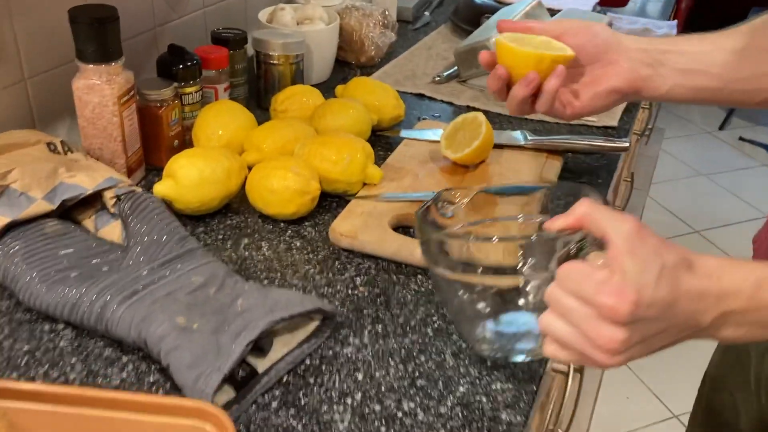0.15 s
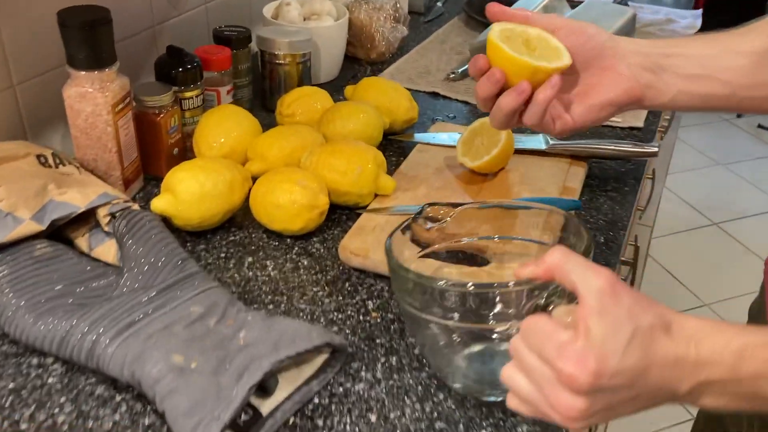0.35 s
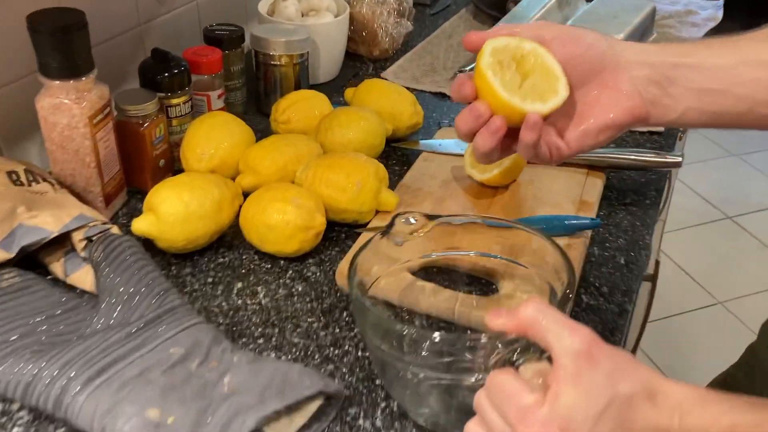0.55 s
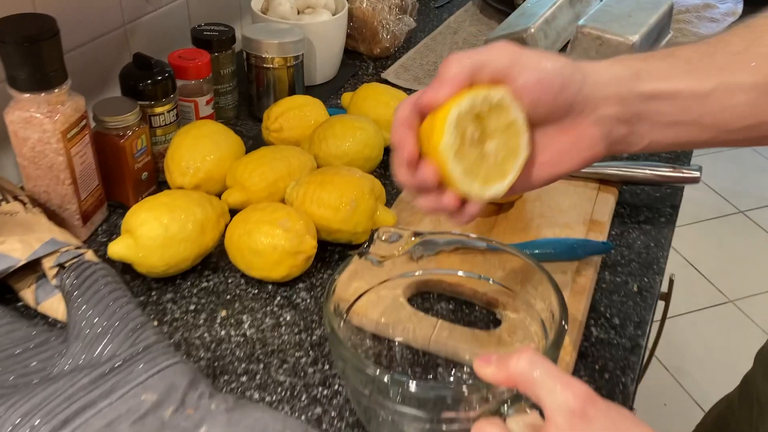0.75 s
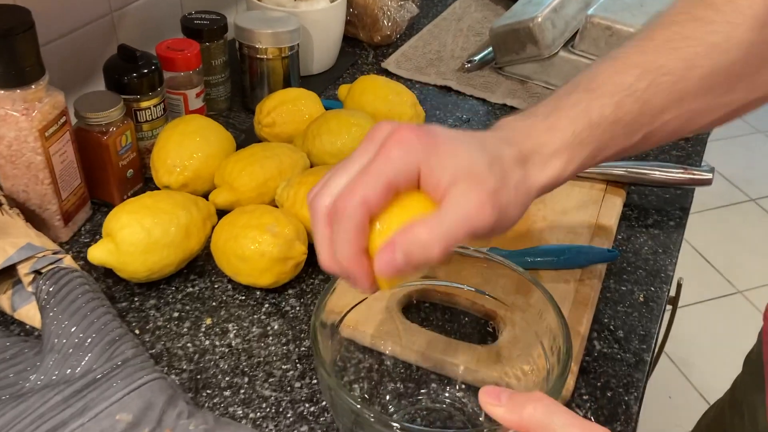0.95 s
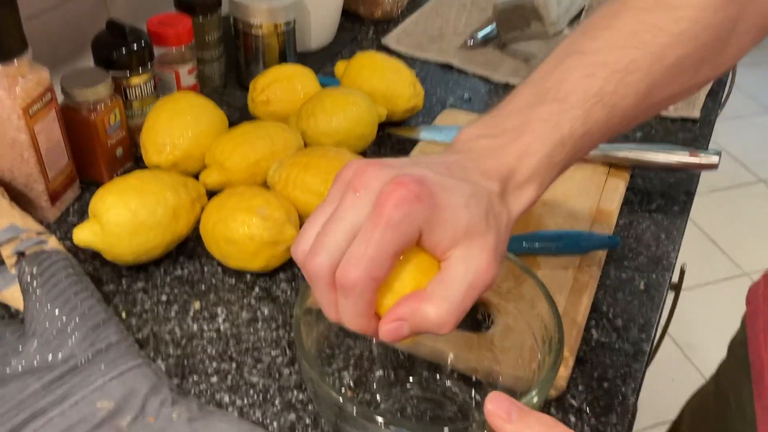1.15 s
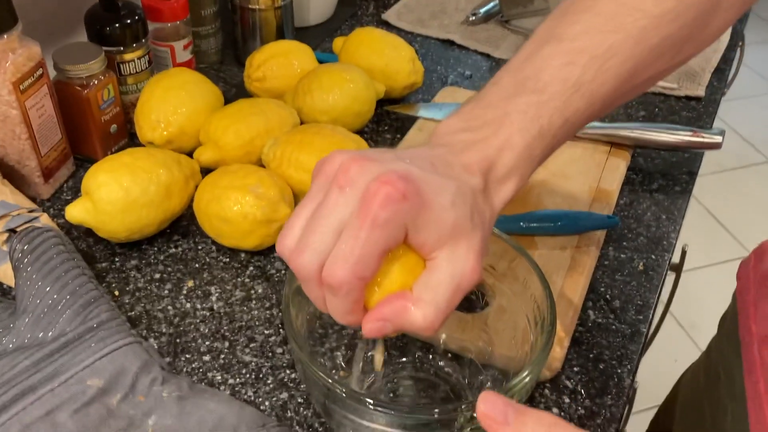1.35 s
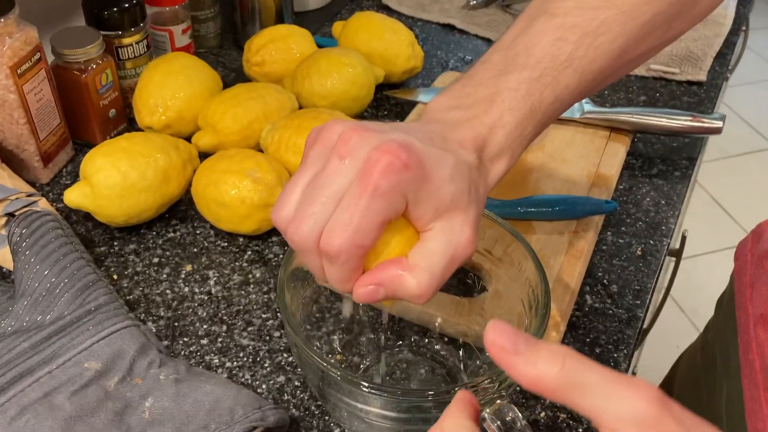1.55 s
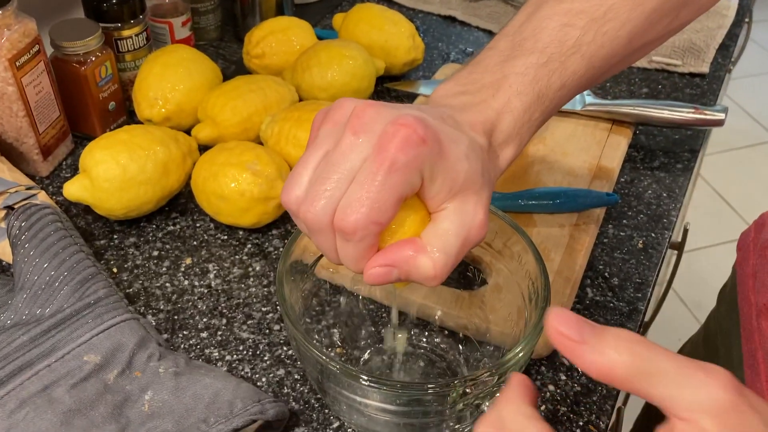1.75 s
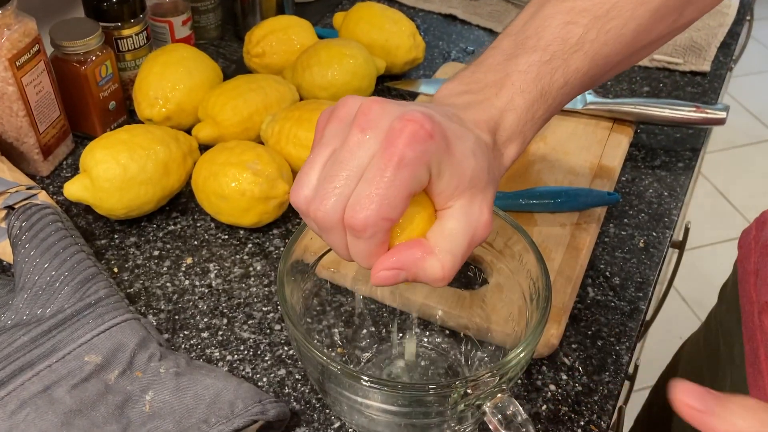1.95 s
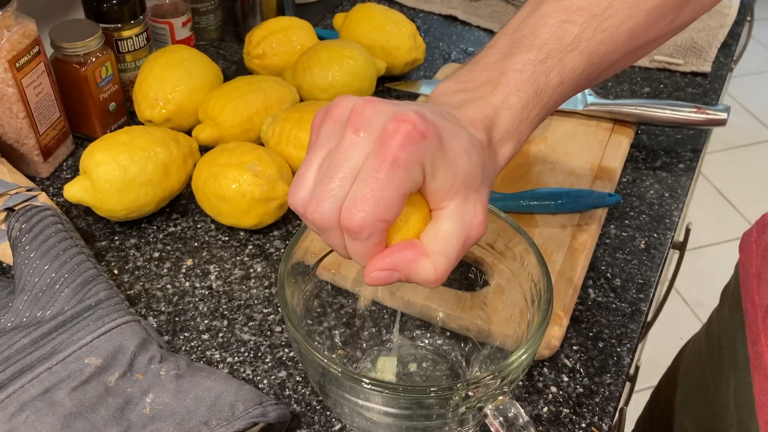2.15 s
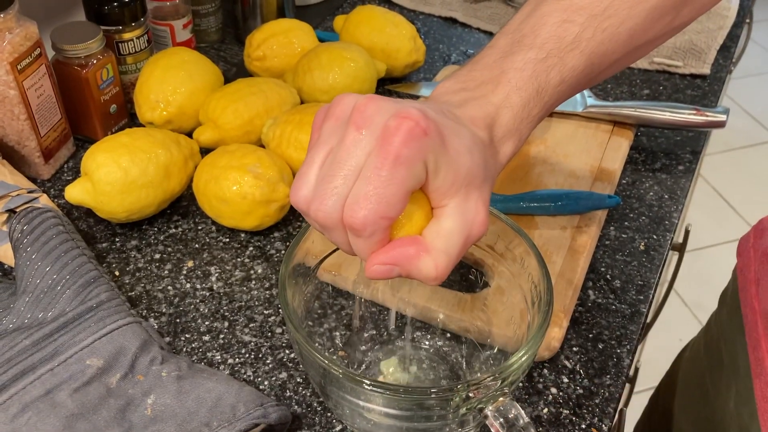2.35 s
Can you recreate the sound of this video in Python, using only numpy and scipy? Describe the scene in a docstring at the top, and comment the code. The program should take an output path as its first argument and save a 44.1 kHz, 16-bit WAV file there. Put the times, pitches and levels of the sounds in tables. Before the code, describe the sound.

Lemon squeezing over a glass jug: a wooden knock, rustle, jug set down, then wet crackles and drips

```python
"""In a kitchen, a lemon half is squeezed over a glass jug.
Something wooden knocks, a rustle of noise and scuffs goes on, and the jug is set down on the stone counter.
Both blows are sets of ringing tones with a noisy tail; the jug also keeps a thin, faint note.
Then the pulp fizzes and snaps in bursts of noise, and juice drops tick into the glass as short rough blips.
Room rumble, hiss and a wavering appliance hum, all made from filtered noise, lie below."""
import sys
import numpy as np
from scipy import signal
from scipy.fft import rfft, irfft
from scipy.io import wavfile

SR = 44100
rng = np.random.default_rng(int(sys.argv[2]) if len(sys.argv) > 2 else 0)


def dump(signal):
    """Clip the signal to [-1, 1] and save it as 16-bit WAV at the path in sys.argv[1]."""
    limited = np.clip(np.atleast_2d(signal).T, -1, 1)
    pcm = np.round(limited * 32767).astype(np.int16)
    wavfile.write(sys.argv[1], SR, pcm)


def magnitude_from_level(level_db):
    """Linear magnitude for a level in decibels (20 dB per decade)."""
    exponent = np.asarray(level_db, float) / 20
    return 10 ** exponent


N = 110250
TIME = np.arange(N) / SR


def rms_one(x):
    """Scale to rms 1."""
    return x / np.sqrt(np.mean(x ** 2) + 1e-20)


def at_hz(points, hz, column=1):
    """Read a table between its rows, on a log-frequency axis."""
    points = np.array(points)
    return np.interp(np.log(hz), np.log(points[:, 0]), points[:, column])


def drift(rate_hz):
    """Random wander of rms 1: noise smoothed twice, computed at every 40th sample."""
    r = np.exp(-2 * np.pi * rate_hz * 40 / SR)
    noise = rng.standard_normal(N // 40 + 2002)
    slow = signal.lfilter([1], [1, -2 * r, r * r], noise)[2000:]  # skip the filter's start
    return np.interp(np.arange(N) / 40, np.arange(len(slow)), rms_one(slow))


def ring(clicks, hz, t60):
    """A resonator: each unit click starts a sine of height 1 that falls 60 dB in t60 seconds."""
    r = magnitude_from_level(-60 / (t60 * SR))
    w = 2 * np.pi * hz / SR
    return signal.lfilter([0, np.sin(w)], [1, -2 * r * np.cos(w), r * r], clicks + 1e-18)


def dying(start, t60, rise):
    """Envelope that rises quickly at start and falls 60 dB in t60 (all in seconds)."""
    t = np.maximum(TIME - start, 0)
    return (1 - np.exp(-t / rise)) * np.exp(-np.log(1000) * t / t60)


# how alike left and right are: (frequency [Hz], likeness [0 to 1])
LEFT_RIGHT_LIKENESS = [(40, 1), (70, 1), (130, 0.73), (290, 0.33), (640, 0.062), (1400, 0.042),
                       (6000, 0.011)]


def bands(extra_likeness=0.):
    """Stereo noise of equal power per Hz, cut into bands of 0.4 octave, given as (Hz, noise)."""
    edges = 20 * 2 ** np.arange(0, 9.8, .4)
    white = rng.standard_normal((2, 2, N))
    for k, (low, high) in enumerate(zip(edges, edges[1:])):
        band_filter = signal.butter(2, [low, high], "band", fs=SR, output="sos")
        # neighbouring bands take different noise
        mid, side = signal.sosfilt(band_filter, white[k % 2])
        hz = np.sqrt(low * high)
        alike = at_hz(LEFT_RIGHT_LIKENESS, hz)
        alike = np.clip(alike + (1 - alike) * extra_likeness, 0, 1)
        opposite = side * np.array([[1], [-1]])
        yield hz, (np.sqrt(1 + alike) * mid + np.sqrt(1 - alike) * opposite) / np.sqrt(2)


def coloured(spectrum, patchy_db, lift_db=0):
    """Stereo noise with flickering bands; rms 1 before a treble lift that is full from 5 kHz up."""
    together, out, power = drift(13.0), 0, 0
    for hz, noise in bands():
        flicker_db = patchy_db * (0.12 * together + drift(27.0))
        band = magnitude_from_level(at_hz(spectrum, hz) + flicker_db) * noise
        power += np.mean(band ** 2)
        lift_share = np.clip(np.log(hz / 500) / np.log(10), 0, 1)  # none below 500 Hz
        out = out + band * magnitude_from_level(lift_db * lift_share)
    return out / np.sqrt(power)


# colour of the kitchen background: (frequency [Hz], relative level [dB per Hz])
ROOM_COLOUR = [(20, -35), (35, 7), (55, -5.5), (75, 1), (100, -4), (170, -19), (240, -11), (350, -13.5),
               (700, -22.5), (1700, -27), (3000, -34), (4200, -47), (7200, -39), (8300, -52.5), (9300, -24),
               (10400, -34.5), (12000, -38), (13700, -49), (15300, -50), (16300, -64)]
# wavering appliance hum: (frequency [Hz], width [Hz], level [dB])
HUM_BANDS = [(66.2, 10.5, -44), (116.8, 8.1, -43.5), (235.6, 6.2, -51)]
# faint tones dying away at the start: (frequency [Hz], level [dB], time to fall 60 dB [s])
FADING_TONES = [(289.5, -47, 6.2), (430, -51, 1.9), (793, -54, 1.7)]


def background():
    """Room rumble and hiss as noise, hum as noise through narrow resonators, and a few fading sines."""
    room_db, hum_wander_db = -41, 2.47
    out = magnitude_from_level(room_db) * coloured(ROOM_COLOUR, patchy_db=1.37)
    for hz, width_hz, db in HUM_BANDS:
        hum = rms_one(ring(rng.standard_normal(N), hz, 2.02 / width_hz))
        out += magnitude_from_level(db + hum_wander_db * drift(5.2)) * hum
    for hz, db, t60 in FADING_TONES:
        tone = np.sin(2 * np.pi * (hz * TIME + rng.random()))
        out += magnitude_from_level(db) * dying(0, t60, 0.00023) * tone
    return out


# course of the rustle and of the noisy room tail after the set-down:
# (time [s], level [dB], treble lift of the patchy noise [dB])
RUSTLE_COURSE = [(0, -73.5, 28), (.1, -62, 20), (.2, -52.5, 5.5), (.45, -45, 3), (.53, -46.5, -1),
                 (0.557, -38.5, -8.5), (.585, -39.5, -10.5), (.64, -40.5, -1), (.67, -43, 4.5),
                 (.72, -46.5, 4.5), (.77, -52, -0.5), (.85, -59, -16), (.875, -48.5, -45),
                 (.905, -43.5, -6), (1.05, -53, -18), (1.14, -59.5, 16.5), (1.301, -59.5, 6)]
# colour of the patchy noise: (frequency [Hz], relative level [dB per Hz])
PATCHY_COLOUR = [(60, -11), (110, -17), (300, -3.5), (600, -17), (1200, -14), (2500, -26.5), (4500, -34),
                 (8000, -35), (16000, -44)]
# body of the scuffs: (frequency [Hz], width setting [Hz], relative level [dB])
SCUFF_BODY = [(100, 47, -2.5), (286, 59, 2), (432, 93, 6), (682, 41, -1.5), (847, 54, -2),
              (1120, 340, -10.5), (2450, 150, -11.5)]


def rustle():
    """Patchy noise plus uneven grains through dull resonators, before and after the set-down."""
    s, db, lift_db = np.transpose(RUSTLE_COURSE)
    # left is 3 dB above right
    level = magnitude_from_level(np.interp(TIME, s, db, right=-120) + np.array([[1.5], [-1.5]]))
    scuffs_per_s = 110
    scuffs = 0
    for hz, width_hz, ring_db in SCUFF_BODY:
        sizes = magnitude_from_level(4.65 * np.minimum(rng.exponential(1, N), 4))
        signs = rng.choice([-1, 1], N)
        grains = sizes * signs * (rng.random(N) < scuffs_per_s / SR)
        # noise of its own on each side blurs the grains
        grains = grains + .5 * np.std(grains) * rng.standard_normal((2, N))
        body = rms_one(ring(grains, hz, 3.6 / width_hz))
        scuffs = scuffs + magnitude_from_level(ring_db + 3.5 * drift(7)) * body
    patchy = coloured(PATCHY_COLOUR, patchy_db=2.5, lift_db=np.interp(TIME, s, lift_db))
    return level * (patchy + rms_one(scuffs))


BLOW_LEAN = magnitude_from_level([[.75], [-.75]])   # lifts the left of both blows 1.5 dB over the right


def struck(touches, modes):
    """Every touch strikes every ringing tone, unevenly; the contact softens the top."""
    mode_lag_s, contact_cut_hz = .00035, 4500   # lag: largest random delay on either side
    out = np.zeros((2, N))
    s, peak_db, tilt_db = np.transpose(touches)
    for hz, db, t60 in modes:
        clicks = np.zeros((2, N))
        arrival = ((s + mode_lag_s * rng.random((2, 1))) * SR).astype(int)
        click_db = peak_db + db + tilt_db * np.log2(hz / 500)
        # chance per touch, then a little more per side
        uneven_db = rng.normal(0, 2.2, len(s)) + rng.normal(0, 1, (2, len(s)))
        clicks[[[0], [1]], arrival] = magnitude_from_level(click_db + uneven_db)
        out += ring(clicks, hz, t60)
    return signal.sosfilt(signal.butter(2, contact_cut_hz, fs=SR, output="sos"), out)


def clatter(start, tail):
    """Noise after a blow that dies band by band, as the sum of an early and a late decay."""
    out = np.zeros((2, N))
    for hz, noise in bands(extra_likeness=0.1):
        rise = 1.2 / hz   # 1.2 cycles
        early = magnitude_from_level(at_hz(tail, hz, 1)) * dying(start, at_hz(tail, hz, 2), rise)
        late = magnitude_from_level(at_hz(tail, hz, 3)) * dying(start, at_hz(tail, hz, 4), rise)
        out += (early + late) * rms_one(noise)
    return out


# touches of the wooden knock: (time [s], level [dB], tilt [dB per octave about 500 Hz])
KNOCK_TOUCHES = [(.2392, -30, 3), (.2418, -23, 4.5), (.2452, -19, 1), (.2545, -21.5, 2.5),
                 (.2715, -36.5, -1.5), (.297, -37, 4)]
# ringing tones of the wood: (frequency [Hz], relative level [dB], time to fall 60 dB [s])
WOOD_MODES = [(67.6, -2, 0.25), (119.5, -0.5, 0.27), (216, -4.5, 0.22), (239, 3.5, 0.075),
              (300, 9.5, 0.044), (333.5, -7.5, 0.34), (413.3, 2.5, 0.26), (482, -7, 0.77), (557, -1, 0.043),
              (626, -12, 0.048), (839, -14.5, 0.23), (917, 3.5, 0.053), (1170, -37, 0.052),
              (1660, -11.5, 0.073), (1903, -21, 0.15), (2295, -16, 0.12), (2620, -36, 0.086),
              (3100, -18, 0.077), (3990, -26, 0.27), (6850, -48.5, 0.74)]
# clatter and room tail: (frequency [Hz], early level [dB], early time to fall 60 dB [s],
# late level [dB], late time to fall 60 dB [s])
KNOCK_TAIL = [(60, -35, 0.46, -50, 0.72), (132, -39, 0.55, -46, 0.77), (266, -18, 0.034, -36.5, 1),
              (470, -15.5, 0.16, -30, 0.58), (1000, -35.5, 0.19, -35.5, 0.51),
              (2020, -21.5, 0.081, -38, 0.63), (4000, -36.5, 0.16, -51.5, 0.86),
              (8000, -47, 0.096, -76, 0.29), (14000, -52, 0.04, -73, .3)]


def wooden_knock():
    """Several quick touches set the wood's tones ringing; clatter starts with the first touch."""
    return BLOW_LEAN * (struck(KNOCK_TOUCHES, WOOD_MODES) + clatter(KNOCK_TOUCHES[0][0], KNOCK_TAIL))


# touches of the jug, faint before full: (time [s], level [dB], tilt [dB per octave about 500 Hz])
SET_DOWN_TOUCHES = [(.8835, -44, -15.5), (.9122, -24.5, 5), (.9177, -20, -5), (.9445, -32, -2),
                    (.978, -33, -6)]
# ringing tones of jug and counter: (frequency [Hz], relative level [dB], time to fall 60 dB [s])
JUG_MODES = [(109, -19, 0.24), (224, -30, 0.16), (259, -5, 0.14), (295, -1, 0.069), (344, -2.5, 0.12),
             (490, 0, 0.1), (675, -8, 0.11), (1152, -14, 0.08), (997, 1, 0.075), (1330, -5, 0.068),
             (1785, -9.5, 0.073), (2545, -18, 0.055), (4393, -30, 0.09)]
# clatter and room tail: (frequency [Hz], early level [dB], early time to fall 60 dB [s],
# late level [dB], late time to fall 60 dB [s])
SET_DOWN_TAIL = [(60, -34, 0.21, -56, 0.48), (119, -58, 0.63, -33.5, 0.49), (279, -17, 0.16, -37.5, 0.3),
                 (570, -41, 0.21, -42.5, 0.92), (930, -15, 0.046, -40, 0.56),
                 (2040, -31, 0.062, -47.5, 0.63), (4000, -61, 0.13, -75, 0.32), (8000, -54, 0.06, -79, .3),
                 (13900, -56, .05, -72, .3)]
# thin note of the glass wall: (frequency [Hz], level [dB], time to fall 60 dB [s])
GLASS_NOTE = (998, -41, 1.0)


def jug_set_down():
    """Touches ring jug and counter; clatter and the glass wall's sine start with the second touch."""
    start = SET_DOWN_TOUCHES[1][0]
    hz, db, t60 = GLASS_NOTE
    note = magnitude_from_level(db) * dying(start, t60, .003) * np.sin(2 * np.pi * hz * TIME)
    return BLOW_LEAN * (struck(SET_DOWN_TOUCHES, JUG_MODES) + note + clatter(start, SET_DOWN_TAIL))


# fizz of pressed pulp: (time [s], level [dB])
FIZZ_COURSE = [(1.1, -75), (1.25, -68), (1.4, -64), (1.5, -77), (1.7, -96), (1.95, -83), (2.07, -57),
               (2.15, -81), (2.21, -61), (2.3, -82), (2.36, -65), (2.5, -70)]


def pulp_fizz():
    """Many tiny random clicks, dealt out to 16 short high resonators, follow the grip."""
    clicks_per_s = 700 * magnitude_from_level(5.0 * drift(12.0))
    sizes = magnitude_from_level(1.1 * np.minimum(rng.exponential(1, N), 5))
    signs = rng.choice([-1, 1], N)
    clicks = sizes * signs * (rng.random(N) < clicks_per_s / SR)
    dealt = rng.integers(0, 16, N)
    fizz = 0
    for k, hz in enumerate(np.geomspace(3000, 15000, num=16)):
        fizz = fizz + ring(clicks * (dealt == k), hz, 10 / hz)   # 60 dB down in 10 cycles
    return magnitude_from_level(np.interp(TIME, *np.transpose(FIZZ_COURSE), left=-120)) * rms_one(fizz)


SPLASH_TAIL_S = 0.26   # time for the faint tail of a drop or snap to fall 60 dB

# juice drops ringing briefly: (time [s], level [dB], frequency [Hz], time to fall 60 dB [s])
JUICE_DROPS = [(1.1762, -45, 2754, 0.03), (1.371, -42, 3330, 0.024), (1.371, -39, 5200, 0.018),
               (1.3715, -38.5, 10500, 0.015), (1.383, -41, 2800, 0.026), (1.431, -42, 2920, 0.037),
               (1.43, -42.5, 1784, 0.034), (1.427, -38, 14600, 0.028), (1.4545, -38, 11070, 0.0078),
               (1.566, -23, 9880, 0.011), (1.571, -45, 7800, 0.018), (1.5923, -37, 10650, 0.011),
               (1.915, -38.5, 12040, 0.01), (1.9906, -37, 11390, 0.013), (2.034, -50.5, 4700, 0.034),
               (2.0335, -41, 8240, 0.014), (2.063, -33, 9000, 0.023), (2.0802, -28.5, 9400, 0.011),
               (2.071, -40, 4100, 0.015), (2.082, -46.5, 6120, 0.078), (2.105, -36, 3270, 0.039),
               (2.188, -45.5, 4000, 0.036), (2.2052, -39.5, 11240, 0.019), (2.2523, -29, 9830, 0.022),
               (2.318, -48.5, 7900, 0.017), (2.353, -39.5, 4820, 0.035), (2.377, -37, 2735, 0.024),
               (2.4077, -44.5, 10400, 0.013), (2.4837, -36, 9900, 0.021)]


def juice_drops():
    """Each drop is a short sine roughened by narrow noise at its pitch, with a faint splash tail."""
    rough_share, tail_db = .7, -26.5
    out = np.zeros((2, N))
    white = rng.standard_normal((2, N))
    for s, db, hz, t60 in JUICE_DROPS:
        narrow_t60 = 10.5 / hz   # 10.5 cycles
        rough = rms_one(ring(ring(white, hz, narrow_t60), hz, narrow_t60))
        tone = np.sin(2 * np.pi * (hz * TIME + rng.random((2, 1))))
        blip = dying(s, t60, 4.7 / hz) * (tone + rough_share * rough)
        tail = magnitude_from_level(tail_db) * dying(s, SPLASH_TAIL_S, 0.0053) * rough
        out += magnitude_from_level(db) * (blip + tail)
    return out


# pulp cells bursting: (time [s], level [dB], lowest frequency [Hz], time to fall 60 dB [s])
PULP_SNAPS = [(1.2084, -38, 1200, 0.012), (1.273, -52, 4000, 0.028), (1.297, -43, 1210, 0.015),
              (1.34, -34.5, 900, 0.0079), (1.371, -54, 6300, 0.054), (1.382, -41.5, 1200, 0.012),
              (1.425, -41, 9900, 0.023), (1.432, -41, 1200, 0.0072), (1.459, -47, 1200, 0.01),
              (1.505, -45, 11100, 0.014), (2.38, -38, 1100, 0.0063), (1.7863, -46, 8000, 0.011),
              (1.849, -47, 7700, 0.023), (1.994, -50, 8000, 0.017), (2.045, -56, 4970, 0.027),
              (2.092, -51, 8000, 0.012), (2.268, -48, 9000, 0.0093), (2.005, -46, 7050, 0.0044),
              (2.06, -56, 3500, 0.033), (2.0782, -42, 7000, 0.0047), (2.104, -46, 4000, 0.0084),
              (2.198, -46.5, 3500, 0.053), (2.2515, -45, 8500, 0.015), (2.355, -43, 4300, 0.024),
              (2.484, -48, 7200, 0.0067)]


def pulp_snaps():
    """Each burst is a broad tick of dulled noise with a peak near 9.5 kHz and a faint tail."""
    peak_db, tail_db = -5, -18
    out = np.zeros((2, N))
    dull = rng.standard_normal(N) + 3.8 * rng.standard_normal((2, N))   # shared + separate noise
    dull = signal.lfilter([1], [1, -.7], dull)
    dull = rms_one(dull) + magnitude_from_level(peak_db) * rms_one(ring(dull, 9500, .0012))
    for s, db, low_hz, t60 in PULP_SNAPS:
        low_cut = signal.butter(2, low_hz, "high", fs=SR, output="sos")
        noise = rms_one(signal.sosfilt(low_cut, dull))
        snap = dying(s, t60, .0003)
        # even out the chance loudness of such short noise
        noise_energy = np.mean(np.sum((snap * noise) ** 2, axis=1))
        snap = snap * np.sqrt(np.sum(snap ** 2) / noise_energy)
        tail = magnitude_from_level(tail_db) * dying(s, SPLASH_TAIL_S, 0.0048)
        out += magnitude_from_level(db) * (snap + tail) * noise
    return out


def scene():
    """All sources together."""
    blows = wooden_knock() + jug_set_down()
    squeeze = pulp_fizz() + juice_drops() + pulp_snaps()
    return background() + rustle() + blows + squeeze


def band_limit(x):
    """A steep low-pass at the top of the band."""
    return signal.sosfilt(signal.butter(12, 15900, fs=SR, output="sos"), x)


# left-right balance by pitch: (frequency [Hz], left minus right [dB])
STEREO_LEAN = [(40, -12.5), (80, 6), (200, -2), (380, 2), (800, 2), (2400, 0.5), (5000, -1), (16000, 4)]


def record(dry):
    """Stereo stage: bass cut, left-right balance by pitch, nearly one treble with turning phase."""
    low_cut_hz, treble_from_hz, in_phase_hz = 50, 6300, 6900
    treble_shared, lag_s, slowing = .97, .000222, .35
    hz = np.arange(N // 2 + 1) * SR / N + 1e-6
    bass_cut = signal.butter(4, low_cut_hz, "high", fs=SR, output="sos")
    left, right = rfft(signal.sosfilt(bass_cut, dry))
    # in the treble, the left is mostly a phase-turned copy of the right
    treble = treble_shared / (1 + (treble_from_hz / hz) ** 24)
    phase = 2 * np.pi * (hz - in_phase_hz) * lag_s
    # with rising pitch the turn slows near in-phase and opposite phase
    turn = np.exp(-1j * (phase - slowing * np.sin(2 * phase)))
    left = np.sqrt(1 - treble) * left + np.sqrt(treble) * right * turn
    lean = magnitude_from_level(at_hz(STEREO_LEAN, hz) / 2)   # half the difference on each side
    mix = irfft(np.array([left * lean, right / lean]), N)
    return band_limit(mix)


dry = scene()
out = record(dry)
dump(out)
```